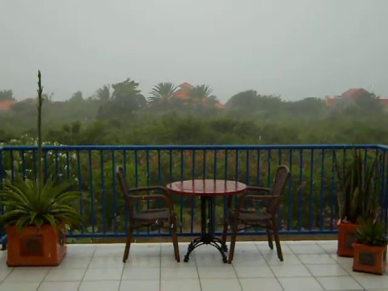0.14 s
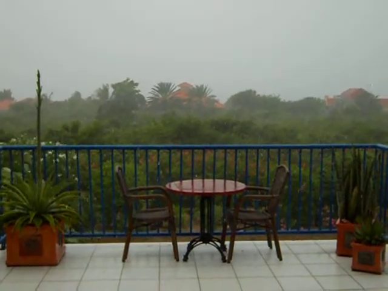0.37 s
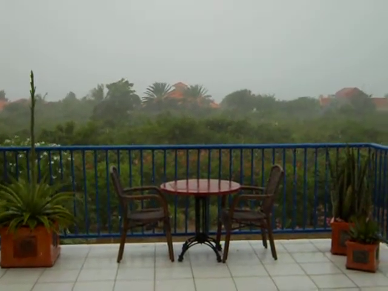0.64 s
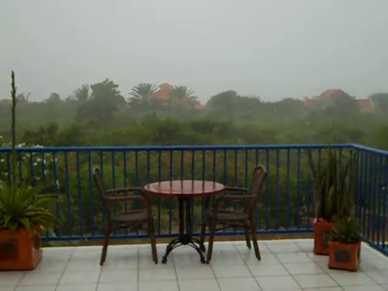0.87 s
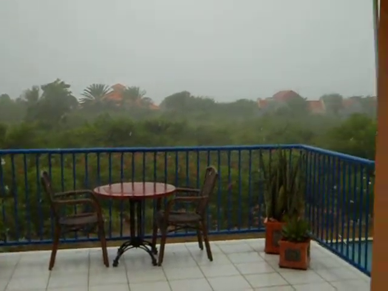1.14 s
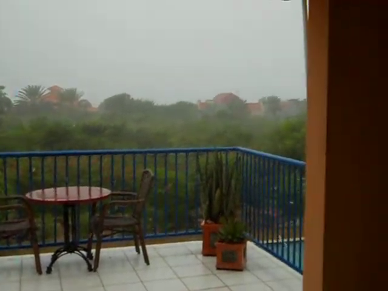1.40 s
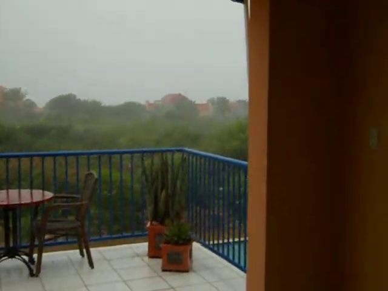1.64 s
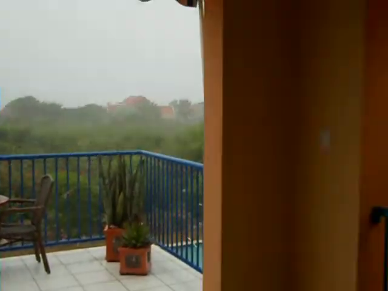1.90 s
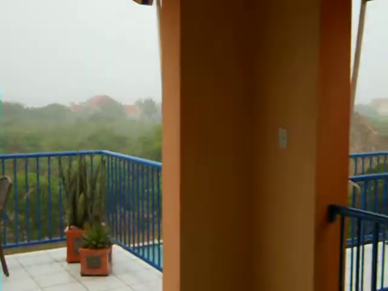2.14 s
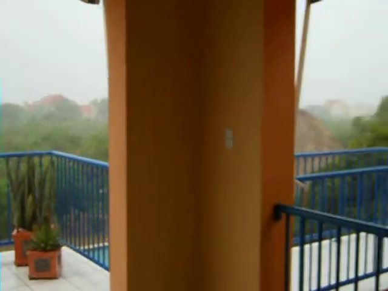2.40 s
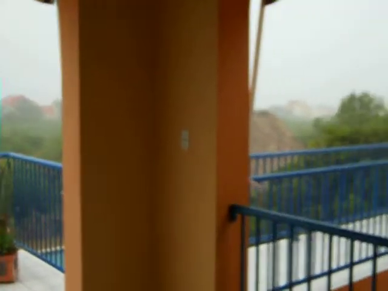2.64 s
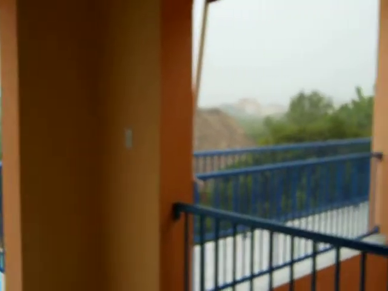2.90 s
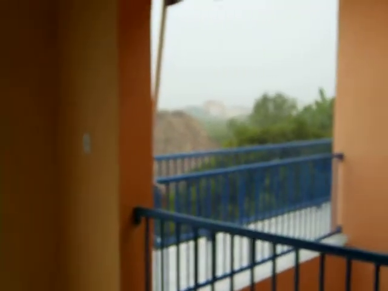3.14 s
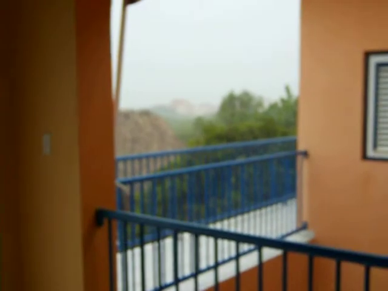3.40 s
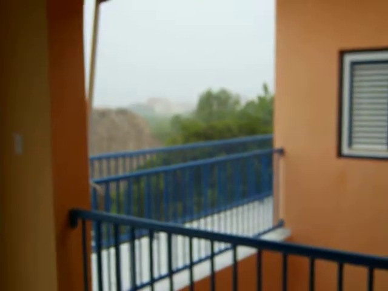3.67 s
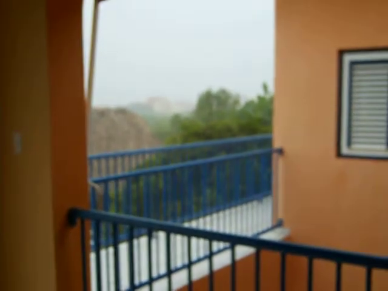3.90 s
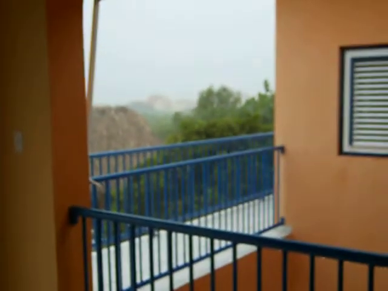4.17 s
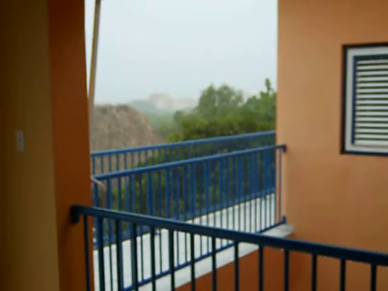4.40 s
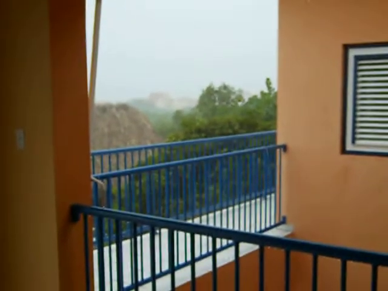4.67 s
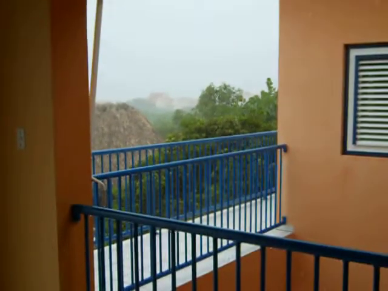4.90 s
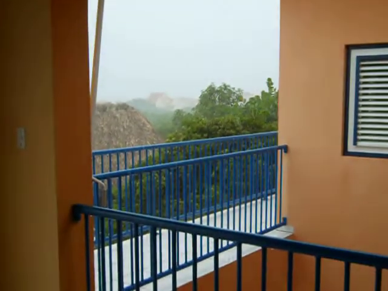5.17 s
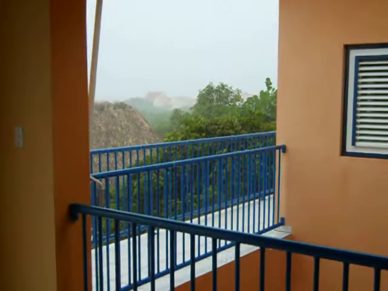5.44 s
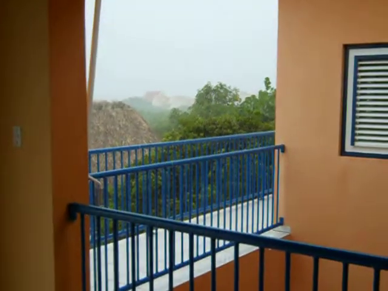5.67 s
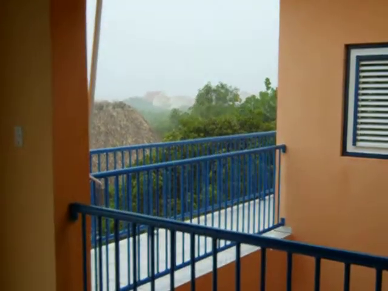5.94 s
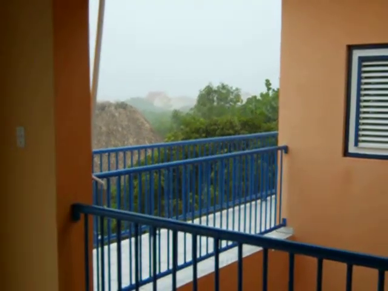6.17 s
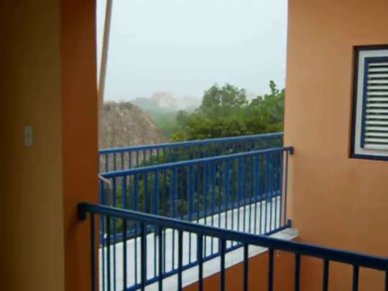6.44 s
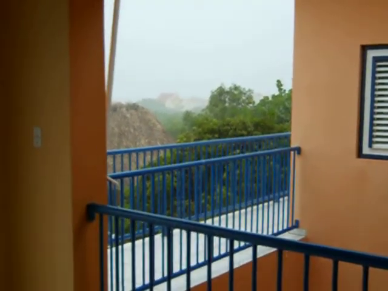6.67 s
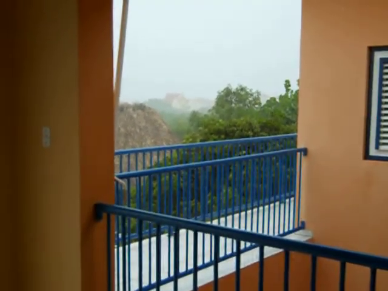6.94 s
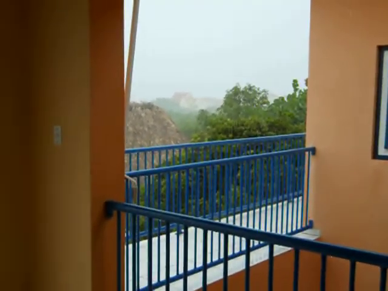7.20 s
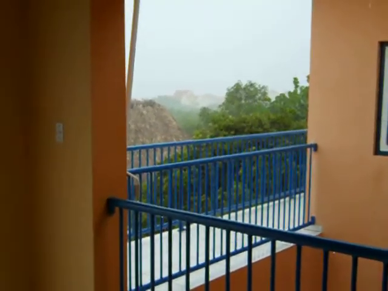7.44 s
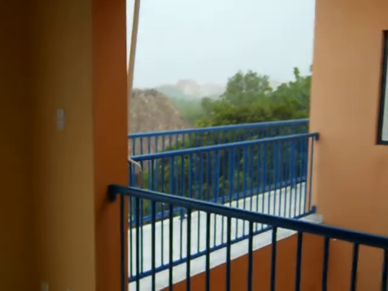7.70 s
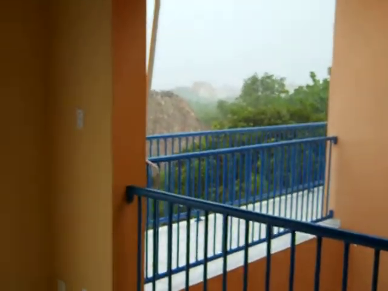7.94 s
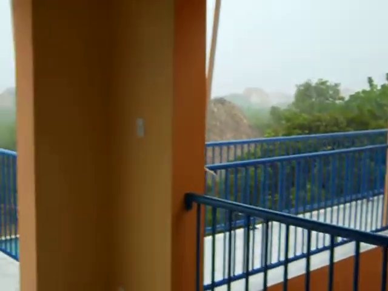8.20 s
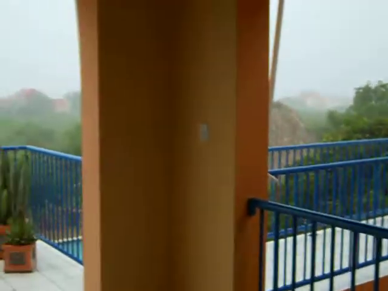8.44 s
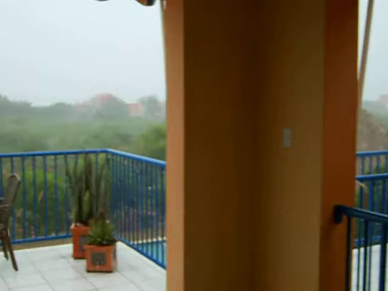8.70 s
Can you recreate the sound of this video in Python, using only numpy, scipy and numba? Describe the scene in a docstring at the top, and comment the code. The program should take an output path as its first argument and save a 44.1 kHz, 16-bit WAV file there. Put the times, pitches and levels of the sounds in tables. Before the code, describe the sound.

Heavy rain roars steadily beyond a covered tiled terrace while runoff splatters and big drops tick sharply close to a small, wind-bumped microphone.

```python
"""A covered tiled terrace in heavy rain, heard through one small camera microphone.
Far rain is a shaped noise roar; runoff splatters on tiles as dense sine grains and bursts in droplet clouds.
Big drops tick and spray close by; buffets and bumps of low noise and tones hit the microphone, low hums swell.
The camera's gain ducks after loud peaks, waits and recovers; slow sampling cuts the top and leaks a mirror image."""
import sys
import numpy as np
from scipy import signal
from scipy.fft import rfft, irfft
from scipy.io import wavfile
from scipy.ndimage import uniform_filter1d
from numba import njit

SR = 44100
rng = np.random.default_rng(int(sys.argv[2]) if len(sys.argv) > 2 else 0)


def dump(signal):
    """Clip the signal to [-1, 1] and save it as 16-bit WAV at the path in sys.argv[1]."""
    limited = np.clip(np.atleast_2d(signal).T, -1, 1)
    pcm = np.round(limited * 32767).astype(np.int16)
    wavfile.write(sys.argv[1], SR, pcm)


def invert_db(level):
    """Linear amplitude ratio for a level in decibels (20 dB per decade), elementwise."""
    return 10 ** (np.asarray(level, dtype=float) / 20)


N = 389403

# Microphone turning towards the open side. Each row: time in seconds, treble lift in dB.
TREBLE_LIFT = [(0, -2.5), (1, -1.5), (2, -0.5), (3.5, -0.4), (5, 0), (6, 1), (7, 1), (8, 1), (8.83, 0.1)]
# Rain at the microphone. Each row: time in seconds, roar level in dB, runoff splatter level in dB.
RAIN_LEVELS = [(0, -27.5, -25), (.7, -28, -28), (1.1, -28, -28), (1.45, -28, -25), (2.1, -29.5, -26.5),
               (2.6, -30, -25), (3.2, -29.5, -27), (3.75, -28.5, -25.5), (4.1, -27.5, -25),
               (4.6, -27.5, -24.5), (5.2, -26, -28.5), (5.8, -28.5, -25), (6.7, -29, -24),
               (7.2, -29, -25.5), (7.65, -27.5, -24.5), (8, -28, -24), (8.83, -27.5, -25.5)]


def curve(table):
    """Columns of a table joined by straight lines, one value per sample."""
    s, *columns = np.transpose(table)
    return [np.interp(np.arange(N) / SR, s, c) for c in columns]


def unit(x):
    """Scale to rms 1."""
    return x / np.sqrt(np.mean(x ** 2))


def band(x, lo_hz, hi_hz, order=2):
    """Butterworth band-pass."""
    return signal.sosfilt(signal.butter(order, [lo_hz, hi_hz], "band", fs=SR, output="sos"), x)


def shape(x, points):
    """Filter by (Hz, dB) points joined on a log-frequency axis."""
    hz, db = np.transpose(points)
    f = np.maximum(np.fft.rfftfreq(N, 1 / SR), 1)
    return irfft(rfft(x) * invert_db(np.interp(np.log(f), np.log(hz), db)), N)


def resonate(modes):
    """Noise ringing in narrow resonances of (Hz, width Hz, dB); rms 1."""
    total = 0
    for hz, width_hz, db in modes:
        noise = rng.standard_normal(N)
        total = total + invert_db(db) * unit(band(noise, hz - width_hz / 2, hz + width_hz / 2, order=1))
    return unit(total)


def walk(rate_hz):
    """Random levels held 1 / rate_hz seconds and smoothed twice; rms 1."""
    k = int(SR / rate_hz)
    held = np.repeat(rng.standard_normal(N // k + 1), k)
    return unit(uniform_filter1d(uniform_filter1d(held, k), k)[:N])


@njit
def grains(start, hz, cycles, size, count):
    """Each impact is a sine that decays to 1/e squared within its number of cycles."""
    out = np.zeros(count)
    for k in range(len(start)):
        p = np.exp((2j * np.pi - 2 / cycles[k]) * hz[k] / SR)
        z = size[k] + 0j
        for i in range(start[k], min(count, start[k] + int(3 * cycles[k] * SR / hz[k]))):
            out[i] += z.imag
            z *= p
    return out


def hum():
    """Low rough tones that swell quickly and fade; level and phase waver."""
    # Each row: start in seconds, level in dB before the waver, pitch in Hz, length in seconds.
    swells = [(2.62, -42, 183, 0.31), (3.36, -41.5, 183, 0.35), (4.17, -39, 183, 0.33),
              (5.75, -45, 206, 0.21), (7.26, -32.5, 203.4, 0.21), (7.46, -35, 183, 0.32)]
    out, t = np.zeros(N), np.arange(N) / SR
    waver = invert_db(1.7 * walk(50))
    wobble_rad = 0.7 * walk(30)
    for s, db, hz, length_s in swells:
        age = np.clip((t - s) / length_s, 0, 1)
        swell = np.sin(np.pi * age ** 0.47) ** 0.64
        out += invert_db(db) * np.sqrt(2) * swell * np.sin(2 * np.pi * hz * (t - s) + wobble_rad)
    return out * waver


def wind():
    """Gusts buffet the port as low noise; soft bumps ring a few cycles and carry a puff of air."""
    # Each row: crest in seconds, buffeting level in dB.
    gusts = [(0.27, -41), (1.8, -40), (2.12, -34), (2.66, -32), (3.0, -36.5), (3.4, -33.5), (3.75, -36),
             (5.7, -44), (6.44, -43), (7.32, -37.5), (7.55, -35), (8.8, -42.5)]
    # Each row: start in seconds, level in dB before the band-pass, pitch in Hz, decay in cycles.
    bump_table = [(.105, -15.5, 80, 1.6), (0.227, -14.5, 110, 1.4), (0.263, -19, 55, 1.6),
                  (0.334, -29, 89, 1.3), (1.756, -19, 160, 1.9), (1.791, -16, 197, 3),
                  (1.812, -18, 80, 1.8), (2.005, -14, 200, 2.4), (2.021, -12, 130, 1.4),
                  (2.092, -18, 140, 1.8), (2.114, -16, 55, 1), (2.15, -27, 130, 1.7), (2.18, -26, 100, 2),
                  (2.609, -29, 128, 6), (2.769, -27, 85, 9.3), (3.335, -23.5, 75.6, 4.5),
                  (3.74, -26, 90, 3.5), (8.753, -23, 64.7, 2.7), (8.771, -26, 129, 2.7)]
    rise_db_per_s, fall_db_per_s, calm_db = 33, 24, -48.5
    t = np.arange(N) / SR
    crests = [db - np.maximum(rise_db_per_s * (s - t), fall_db_per_s * (t - s)) for s, db in gusts]
    buffet_db = np.maximum(np.max(crests, axis=0), calm_db)
    buffet = unit(band(rng.standard_normal(N), 45, 200) * invert_db(3.0 * walk(14)))
    s, level_db, hz, cycles = np.transpose(bump_table)
    start = (s * SR).astype(np.int64)
    bumps = band(grains(start, hz, np.clip(cycles, 0.5, 12), invert_db(level_db), N), 25, 420)
    bump_rms = np.sqrt(uniform_filter1d(bumps ** 2, int(0.05 * SR)).clip(0))
    puff = bump_rms * unit(band(rng.standard_normal(N), 50, 340))
    return invert_db(buffet_db) * buffet + bumps + invert_db(-3.0) * puff


def roar():
    """Far drops blend to noise whose half-octave bands flicker; porch air and mains hum lie under it."""
    # Each row: frequency in Hz, relative spectral density in dB.
    colour = [(24, -35.5), (40, -2), (92, -16), (189, -8), (251, -4.5), (715, 1.5), (1380, 0), (3300, -3.5),
              (6930, -1.5), (7400, -1.5), (9620, -20.5), (16300, -120)]
    # Air of the covered porch. Each row: centre in Hz, width in Hz, relative level in dB.
    porch = [(20, 5.4, 6), (80, 36, -4), (94.8, 10, -6), (135.3, 10, -3), (183, 9.1, -1.5),
             (214.8, 13, -1.5)]
    mains_hz, mains_db = 52.7, -21.5  # level against the roar, before its wander
    level_db, _ = curve(RAIN_LEVELS)
    noise = shape(rng.standard_normal(N), colour)
    noise /= np.std(band(noise, 350, 1600, order=4))
    edges_hz = 500 * 2 ** np.arange(0, 4.1, 0.5)
    flicker = np.zeros(N)
    for lo_hz, hi_hz in zip(edges_hz, edges_hz[1:]):
        flicker += (invert_db(0.32 * walk(9)) - 1) * band(noise, lo_hz, hi_hz)
    lift_db, = curve(TREBLE_LIFT)
    noise = noise + (invert_db(lift_db) - 1) * band(noise, 5400, 11000, order=1)
    mains_level = invert_db(mains_db + 2.0 * walk(2.7))
    mains = mains_level * np.sin(2 * np.pi * mains_hz * np.arange(N) / SR)
    return invert_db(level_db) * (noise + flicker + invert_db(-11.0) * resonate(porch) + mains)


def splatter():
    """Runoff bursting on tiles: short equal ticks of random sign around a wandering pitch."""
    ticks_per_s, cycles = 3000, 1.74
    pitch_hz, octaves_per_db, wander_oct = 3830, 0.17, 0.1  # brightens with the treble lift
    surge_db = 0.76
    _, level_db = curve(RAIN_LEVELS)
    lift_db, = curve(TREBLE_LIFT)
    centre_hz = pitch_hz * 2 ** (octaves_per_db * lift_db + wander_oct * walk(6))
    place, tone, tone2 = rng.random((int(N / SR * ticks_per_s), 3)).T
    start = (place * N).astype(np.int64)
    sign = np.sign(tone - tone2)
    octaves = 0.4 * 2.26 * (tone + tone2 - 1)
    hz = np.clip(centre_hz[start] * 2 ** octaves, 500, 9000)
    ticks = unit(band(grains(start, hz, np.full(len(hz), cycles), sign, N), 1440, 15000))
    return invert_db(level_db + surge_db * walk(7)) * ticks


def splashes():
    """Each gout of runoff breaks into a cloud of droplets, swelling fast and thinning out."""
    # Each row: start in seconds, level in dB, pitch in Hz.
    gouts = [(0.038, -25.5, 3540), (0.348, -29.5, 3970), (0.556, -32.5, 2500), (0.74, -34.5, 3500),
             (0.8, -25.5, 3170), (1.204, -30, 5300), (1.335, -30.5, 2760), (1.398, -25.5, 7200),
             (1.689, -26.5, 5030), (1.761, -28, 3270), (2.163, -23, 4900), (2.421, -26.5, 6150),
             (2.59, -29, 4800), (2.64, -28.5, 5000), (2.869, -27, 3580), (3.48, -31, 4350),
             (3.552, -26, 6700), (3.798, -19, 5300), (4.1, -27, 4500), (4.67, -24, 4260),
             (4.912, -27.5, 6370), (5.118, -27, 3970), (5.273, -27.5, 3120), (5.7, -28, 3040),
             (5.915, -29.5, 3530), (6.15, -25.5, 6600), (6.341, -27.5, 2300), (6.546, -28.5, 3900),
             (6.714, -27.5, 4000), (6.741, -26, 6300), (6.87, -29, 6900), (6.96, -29, 2900),
             (6.997, -26, 4760), (7.33, -27.5, 2700), (7.383, -24, 6900), (7.782, -28.5, 6630),
             (8.245, -28.5, 3200), (8.361, -25, 6130), (8.616, -29, 3270)]
    droplets, spread_db, cycles = 140, 4.0, 3.66
    length_s, range_hz = 0.1, 1650
    n = int(length_s * SR)
    out = np.zeros(N)
    for s, db, hz in gouts:
        delay, tone, rank = rng.random((3, droplets))
        start = (n * delay ** 1.2).astype(np.int64)
        envelope = (1 - 0.67 * delay) * np.clip(delay / 0.032, 0, 1)
        size = invert_db(-spread_db * np.log(1 - 0.98 * rank)) * envelope
        pitch_hz = np.clip(hz + range_hz * (tone - 0.5), 500, 8000)
        size = size / np.sqrt(cycles * SR / pitch_hz)  # equal energy at any pitch
        cloud = grains(start, pitch_hz, np.full(droplets, cycles), size, n + 400)
        cloud = band(cloud, 1300, 11000, order=1)
        i = int(s * SR)
        out[i:i + len(cloud)] += invert_db(db) * unit(cloud)[:N - i]
    return out


def drops():
    """Big drops close by and smaller random ones: a click, a sharp tick and a short spray of noise."""
    # Each row: start in seconds, relative level in dB, pitch in Hz.
    big = [(0.0355, 1, 3500), (0.348, -6, 3500), (0.379, -2, 3400), (0.7695, -2, 3300), (0.773, -7.5, 4500),
           (0.7986, -0.5, 3140), (0.803, 0, 4700), (0.9223, -1, 5000), (1.098, -9, 3460),
           (1.1985, -2, 4730), (1.297, -1.5, 5030), (1.3936, 0.5, 4400), (1.4933, 1.5, 4500),
           (1.589, -6, 5040), (1.685, -8, 5080), (1.9475, -8, 4130), (2.104, -3, 4500),
           (2.1607, -1.5, 4800), (2.429, -6, 5690), (2.558, -8, 4100), (2.577, -0.5, 3960),
           (2.598, -11, 5500), (2.705, -4, 4020), (2.869, 0, 3540), (3.471, -8, 5730), (3.549, 0, 6560),
           (3.785, -10, 4000), (3.7936, 5.5, 5020), (4.0383, -3, 3200), (4.104, -5, 4290),
           (4.119, -2, 4270), (4.605, -3, 4200), (4.91, -3, 4700), (5.982, -5, 6640), (6.0135, -3, 5200),
           (6.0172, -1.5, 6930), (6.164, -9, 5300), (6.369, -6.5, 3960), (6.5389, -1.5, 4100),
           (6.628, -8, 4000), (6.7135, -7.5, 4300), (6.733, -7.5, 4600), (6.741, -8, 4460),
           (6.967, -7, 5530), (6.9934, -7, 5010), (7.0001, -3, 4600), (7.0202, -5, 4700),
           (7.264, -10, 5630), (7.405, -7, 6410), (8.035, -1, 3860), (8.149, -10, 5800), (8.244, -3, 3280),
           (8.35, -3, 3670), (8.392, -6.5, 6300), (8.714, -3, 4500)]
    small_per_s, small_db, small_spread_db, small_hz = 20, -18, 3.2, 4600
    tick_cycles, spray_db, spray_decay_s = 1.63, -15.5, 0.0049
    place, rank, tone = rng.random((int(N / SR * small_per_s), 3)).T
    small = [place * N / SR,
             small_db - small_spread_db * np.log(1 - 0.95 * rank),
             small_hz * 2 ** (1.6 * (tone - 0.5))]
    s, level_db, hz = np.hstack([np.transpose(big), small])
    start, count = (s * SR).astype(np.int64), len(s)
    ticks = grains(start, hz, np.full(count, tick_cycles), 1.465 * invert_db(level_db), N)
    # first contact: a bare click reaching the very top
    clicks = grains(start, np.full(count, 7200.), np.full(count, 1.2), invert_db(level_db - 8.5), N)
    out = band(ticks, 1300, 11300, order=1) + band(clicks, 3500, 12000, order=1)
    t = np.arange(int(0.1 * SR)) / SR
    envelope = np.exp(-t / spray_decay_s) * np.clip(t / 0.001 - 0.5, 0, 1)
    for i, db, f in zip(start, level_db, hz):
        noise = unit(band(rng.standard_normal(len(t)), 0.86 * f, min(1.7 * f, 9000)))
        spray = invert_db(db + spray_db) * envelope * noise
        out[i:i + len(t)] += spray[:N - i]
    return out


@njit
def ride(x, ceiling, gain, hold, step):
    """A peak over the ceiling pulls the gain down; after hold samples it climbs back to one."""
    out, wait = np.empty(len(x)), 0.
    for i in range(len(x)):
        if abs(x[i]) * gain > ceiling:
            gain, wait = ceiling / abs(x[i]), hold
        elif wait > 0:
            wait -= 1
        else:
            gain = min(1., gain * step)
        out[i] = gain
    return out


def gain_control(x):
    """The camera's gain follows a little late, so the tick that trips it still gets through."""
    ceiling_db, start_gain_db = -4.5, -9.0
    hold_s, recover_db_per_s, lag_s = 0.79, 11, 0.0051
    gain = ride(x, invert_db(ceiling_db), invert_db(start_gain_db), hold_s * SR, invert_db(recover_db_per_s / SR))
    pole = np.exp(-1 / (lag_s * SR))
    return signal.lfilter([1 - pole], [1, -pole], gain, zi=[pole * gain[0]])[0]


def scene():
    """One microphone feeds both channels."""
    mono = hum() + wind() + roar() + splatter() + splashes() + drops()
    return np.tile(mono, (2, 1))


def roll_off(x):
    """The treble ends steeply here."""
    return signal.sosfilt(signal.butter(12, 9100, fs=SR, output="sos"), x)


def record(dry):
    """Gain control, soft limiting and slow sampling, whose playback leaks a faint mirror image."""
    # Top cut before sampling. Each row: frequency in Hz, gain in dB.
    capture_edge = [(7300, -0.5), (7600, 0), (7990, -9.5), (8010, -40), (8100, -89)]
    # Top cut on playback. Each row: frequency in Hz, gain in dB.
    playback_edge = [(7300, 0), (7600, -2.5), (8000, -3.5), (8400, -14), (8700, -24), (9000, -34.5),
                     (9300, -54), (9800, -120)]
    sampling_hz = 16000
    rounded = 0.76 * np.tanh(gain_control(dry[0]) * dry / 0.74)  # the loudest ticks are rounded
    sampled = shape(rounded, capture_edge)
    # reflected about half the sampling rate
    mirror = 2 * sampled * np.cos(2 * np.pi * sampling_hz * np.arange(N) / SR)
    return roll_off(shape(sampled + mirror, playback_edge))


dry = scene()
out = record(dry)
dump(out)
```